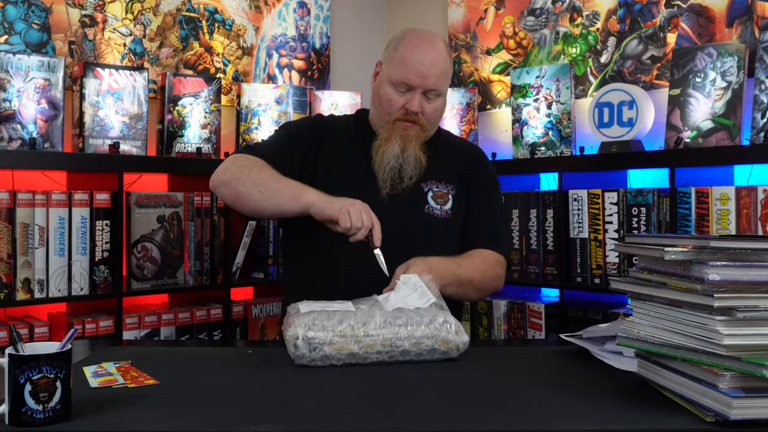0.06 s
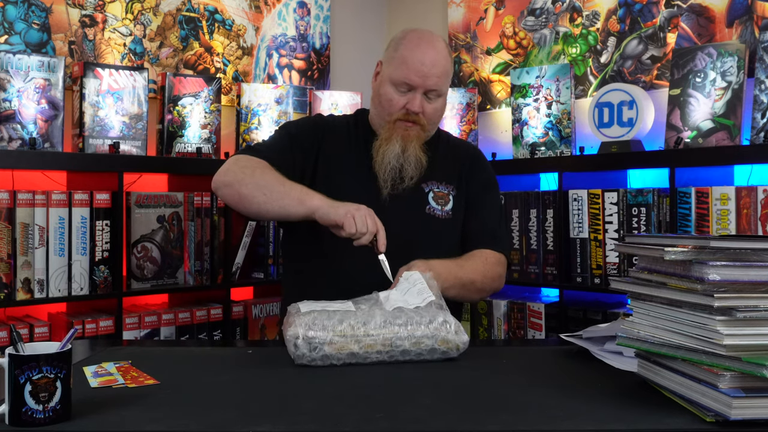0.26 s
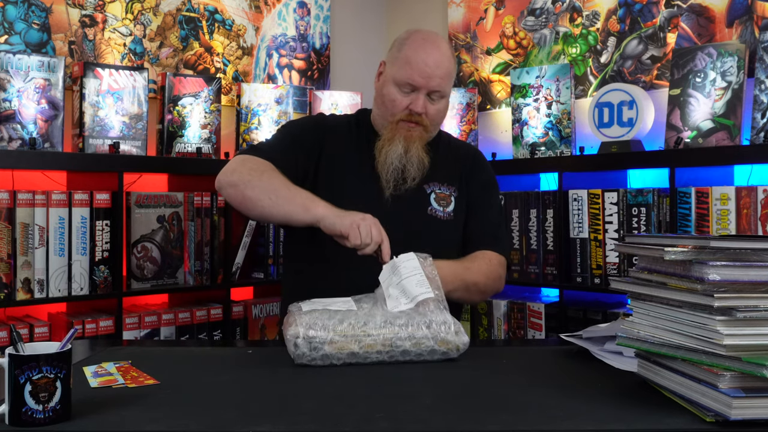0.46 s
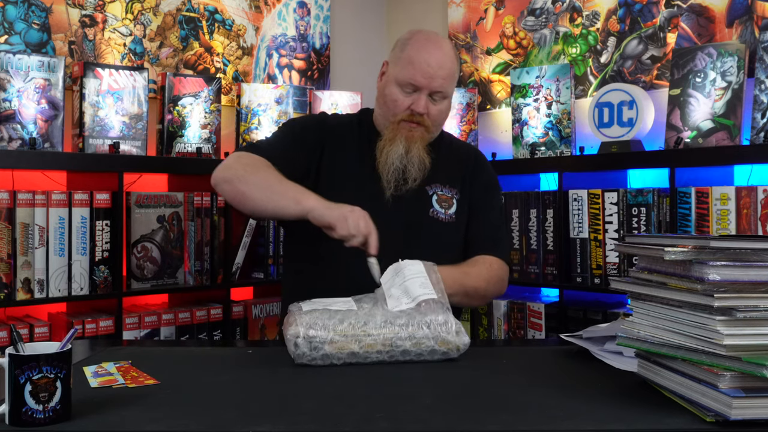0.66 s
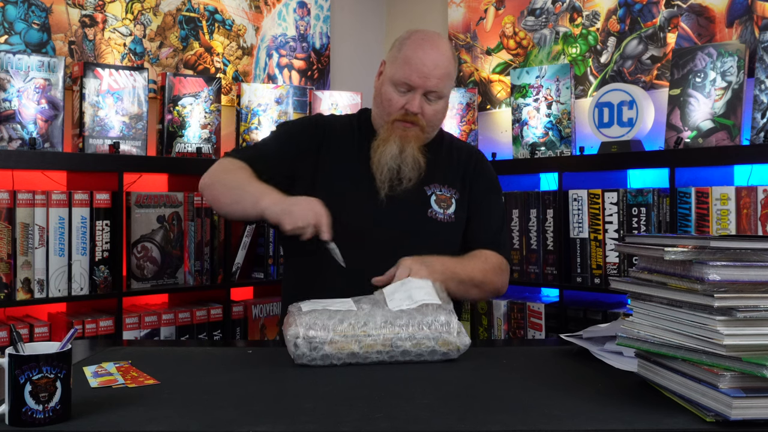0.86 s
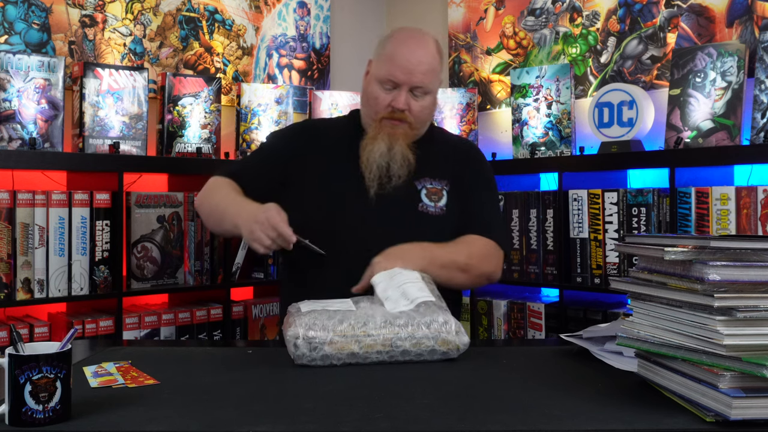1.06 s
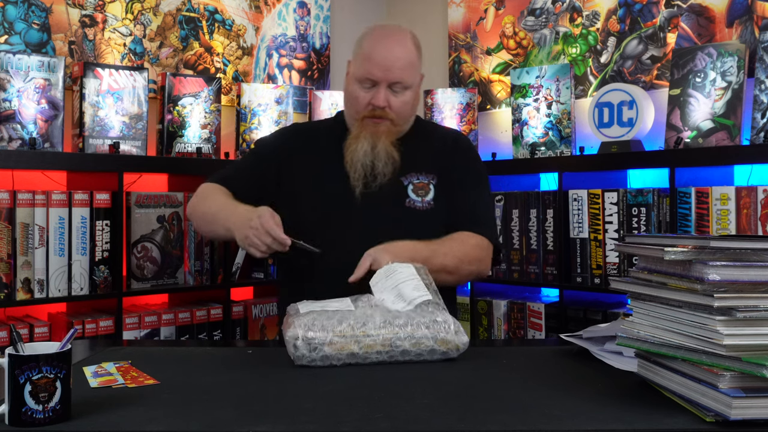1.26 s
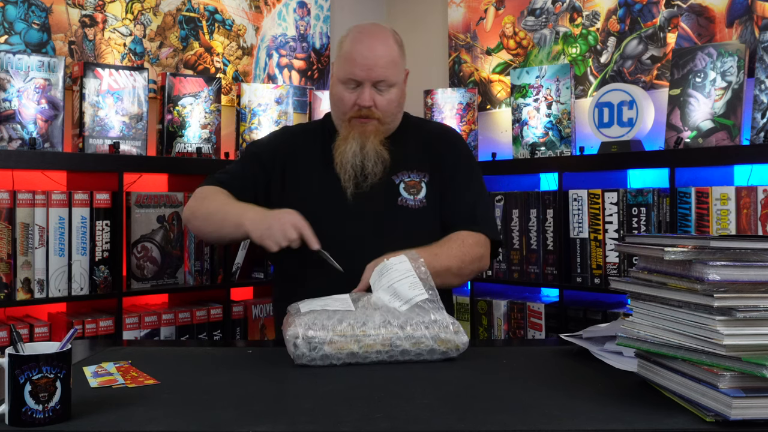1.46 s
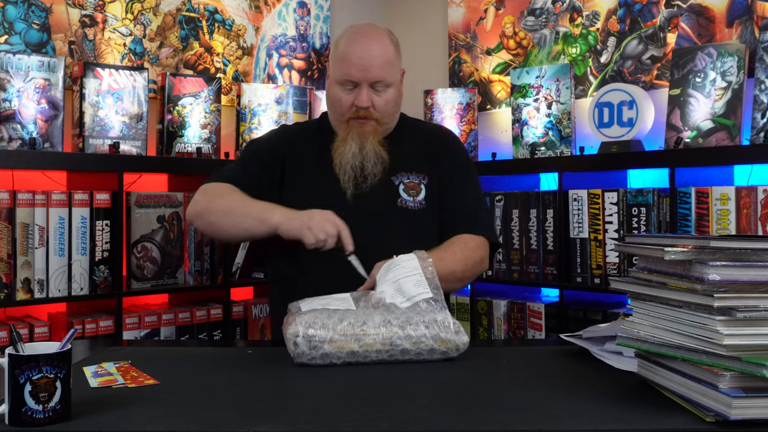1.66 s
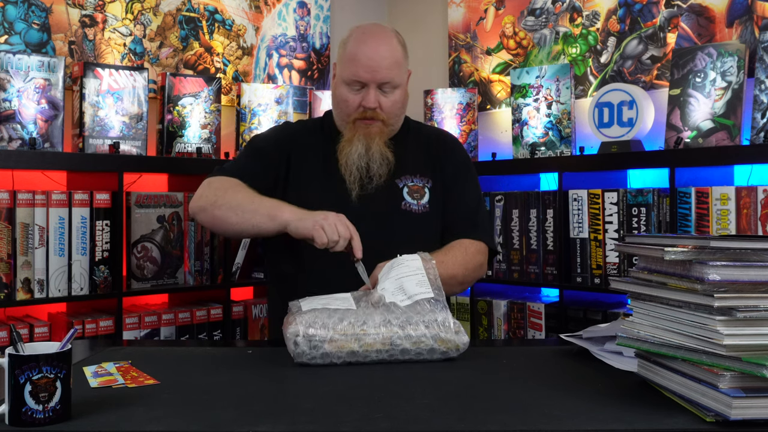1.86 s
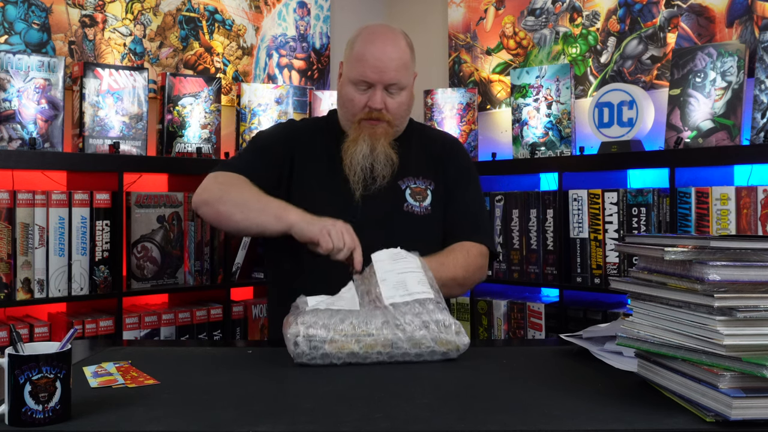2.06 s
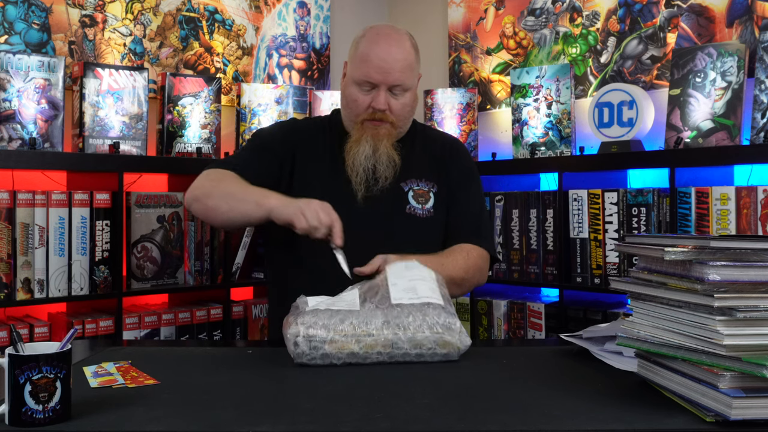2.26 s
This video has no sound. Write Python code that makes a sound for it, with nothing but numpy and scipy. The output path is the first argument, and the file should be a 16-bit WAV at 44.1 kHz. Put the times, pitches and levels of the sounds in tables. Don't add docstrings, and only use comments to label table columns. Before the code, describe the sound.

A plastic bubble mailer is slit open by a knife, heard close in a small furnished room. Crinkling runs throughout. A sharp snap at 0.2 s leads into fine blade ticks, then a loud cell pop and rasp near 0.39 s. Light crackles follow until rapid, hard tearing snaps at 1.3-1.55 s. It quiets, then another bubble bursts at 2.0 s, with small crackles after.

```python
import sys
import numpy as np
from scipy import signal
from scipy.io import wavfile
from scipy.ndimage import uniform_filter1d

SR = 44100
rng = np.random.default_rng(int(sys.argv[2]) if len(sys.argv) > 2 else 0)


def ratio_of_db(decibels):
    return 10 ** (np.asarray(decibels, float) / 20)


def int16_out(signal):
    q = np.round(np.clip(np.atleast_2d(signal).T, -1, 1) * 32767)
    wavfile.write(sys.argv[1], SR, q.astype(np.int16))


N = 101429


def evened(x):
    return x / np.sqrt(np.mean(x ** 2) + 1e-20)


def read(points, hz):
    f, value = np.transpose(points)
    return np.interp(np.log(hz + 1), np.log(f + 1), value)


def add(mix, s, sound):
    part = mix[round(s * SR):][:len(sound)]
    part += sound[:len(part)]


def impulse(length):
    return 1. * (np.arange(length) == 0)


def coloured(x, points, skirt_db=-25):
    hz = abs(np.fft.fftfreq(4096, 1 / SR))
    (low_hz, low_db), (high_hz, high_db) = points[0], points[-1]
    below, above = (low_hz / 3, low_db + skirt_db), (high_hz * 2, high_db + skirt_db)
    log_gain = np.log(ratio_of_db(read([below] + list(points) + [above], hz)))
    phase = -signal.hilbert(log_gain).imag
    taps = np.fft.ifft(np.exp(log_gain + 1j * phase)).real[:2048]
    return signal.oaconvolve(x, taps)[:len(x)]


def ring(hz, t60, sag=0.):
    t = np.arange(3000) / SR
    pitch = hz * (1 - sag * np.minimum(6 * t / t60, 1))
    turns = np.cumsum(pitch) / SR
    rise_s = .00005
    return (1 - np.exp(-t / rise_s)) * ratio_of_db(-60 * t / t60) * np.sin(2 * np.pi * turns)


# (f/Hz, level/dB per Hz)
AIR_SPECTRUM = [(12, -25), (20, -1.5), (377, -4.5), (434, 6), (558, -35), (1570, -30), (3340, 1),
                (7730, -22), (16000, -22)]


def room_air():
    return ratio_of_db(-60) * evened(coloured(rng.standard_normal(N), AIR_SPECTRUM))


# (t/s, level/dB, share of the soft body/dB)
GRIP_EFFORT = [(0, -44, -1.5), (.06, -47.5, -5), (.12, -49.5, -4), (.19, -57.5, -6), (.33, -51.5, -4),
               (.38, -54, -26), (.52, -56.5, 7.5), (.62, -62.5, -1.5), (.73, -49, -5), (.8, -56.5, -3.5),
               (.86, -47, -3), (0.978, -48, -2.5), (1.007, -55.5, -5.5), (1.14, -41.5, -7), (1.3, -46, -2),
               (1.7, -59.5, -1), (2.19, -76, 5), (2.27, -52, -2)]
# (f/Hz, level/dB per Hz)
FILM_SPECTRUM = [(710, -32), (1200, -11.5), (1560, -8), (2250, -11), (2450, -6), (3430, 1.5), (7820, -12.5),
                 (12900, -23.5), (16000, -31)]
# (f/Hz, level/dB per Hz)
BODY_SPECTRUM = [(59, -32), (100, -20.5), (576, -1), (817, -4), (1060, -1.5), (1540, -10.5), (2500, -0.5),
                 (3250, -43), (5500, -120)]


def crinkle():
    grains_per_s, spread_db, clump_db, body_gain_db = 1800, 5.2, 2.6, -1.5
    t = np.arange(N) / SR
    s, effort_db, body_db = np.transpose(GRIP_EFFORT)
    slow = uniform_filter1d(rng.standard_normal(N), 300)
    clumps = evened(uniform_filter1d(slow, 300))
    size_db = spread_db * np.minimum(rng.exponential(1, (2, N)), 4) + clump_db * clumps
    draw, chance = rng.random((2, N)), grains_per_s / SR
    signs = (draw < chance) - 2. * (draw < chance / 2)
    grains = ratio_of_db(size_db) * signs
    film = evened(coloured(grains[0], FILM_SPECTRUM))
    body = evened(coloured(grains[0] + grains[1], BODY_SPECTRUM))
    body = body * ratio_of_db(body_gain_db + np.interp(t, s, body_db))
    return (film + body) * ratio_of_db(np.interp(t, s, effort_db))


# (delay t/s, level/dB)
DESK_ECHOES = [(.0006, -8.5), (.0011, -21.5)]


def snap(spike, film_hz, cushion_db, luck):
    spike = ratio_of_db(-4.3) * spike / abs(spike).max()
    t60 = .0045 * (.7 + .5 * luck[0])
    partner_hz = 1.298 * film_hz * (1.0 + 0.033 * luck[3])
    film = ring(film_hz, t60) + ratio_of_db(-2) * ring(partner_hz, 0.31 * t60)
    tick = ratio_of_db(-19) * ring(5800 * (0.92 + 0.37 * luck[1]), t60=0.0041)
    film = 1.1 * film + tick
    cushion = ratio_of_db(cushion_db) * ring(1350 * (.9 + .2 * luck[2]), t60=.012, sag=.5)
    cut = signal.butter(N=2, Wn=320, btype="high", fs=SR, output="sos")
    direct = signal.sosfilt(cut, spike + film + cushion)
    bare = signal.sosfilt(cut, 1.5 * spike + .3 * film + .45 * cushion)
    near = direct.copy()
    for (s, db), chance in zip(DESK_ECHOES, luck[4:]):
        add(near, s * (0.69 + .5 * chance), ratio_of_db(db) * direct[:2000])
    return near, bare


# (f/Hz, level/dB)
BREAK_SPECTRUM = [(500, -20), (1500, -14), (2400, -20), (3300, 0), (5000, -1), (6500, -9), (10000, -14),
                  (16000, -26)]


def snaps(table):
    break_hz = 3700
    out, n = np.zeros((2, N)), np.arange(3000)
    spike = coloured(impulse(3000), BREAK_SPECTRUM)
    for (s, db, film_hz, cushion_db), luck in zip(table, rng.random((30, 6))):
        own = np.interp(n * np.sqrt(film_hz / break_hz), n, spike)
        for mix, x in zip(out, snap(own, film_hz, cushion_db, luck)):
            add(mix, s, ratio_of_db(db) * x)
    return out


# (t/s, level/dB, film f/Hz, cushion share/dB)
CREASE_FLIPS = [(0.0197, -36, 3200, 0), (0.0368, -27, 3500, -18), (0.0811, -36.5, 4700, 3.5),
                (0.1174, -29, 4300, -37), (0.1317, -26.5, 3300, -4.5), (0.2104, -37, 4900, -8),
                (0.5366, -27.5, 2800, -19), (0.5477, -27, 2800, -14), (0.5663, -33, 2110, -1.5),
                (0.5822, -30.5, 2310, -28), (0.6054, -39, 3680, -27), (0.6271, -42, 3520, -16),
                (0.7925, -32, 3220, -7), (0.8833, -32, 3440, -6), (0.9372, -34, 4170, 3.5),
                (0.9746, -29, 3430, -5.5), (1.0315, -37, 4240.0, -7.5), (1.0574, -34, 4100, -42),
                (1.1205, -39, 3480, -19), (1.151, -41, 3500, 5), (1.1685, -29, 3130, -2.5),
                (1.2411, -30.5, 2380, -4.5), (1.8928, -32.5, 3540, -17), (1.9229, -42, 3300, -3),
                (1.9373, -37.5, 3160, -8), (1.9521, -33, 2960, -12), (2.1225, -34, 4470, -0.5)]


def creases():
    return snaps(CREASE_FLIPS)


# (t/s, level/dB, film f/Hz, cushion share/dB)
BLADE_SLIPS = [(.2268, -24, 3400, -20), (.2385, -24, 3200, -20), (.245, -25, 4800, -25),
               (.2485, -26, 3400, -20), (.254, -29, 4200, -20), (.2615, -29, 4000, -20),
               (.270, -28, 3600, -20), (.2725, -25, 3500, -20), (.2745, -27, 3500, -20),
               (.2775, -23, 3500, -20), (.282, -28, 3500, -20), (.287, -24, 3600, -20),
               (.2925, -28, 3500, -20), (.295, -26, 3500, -20), (.301, -29, 3200, -20),
               (.3355, -15, 3000, -18), (.0505, -29, 3260, -20), (2.1941, -22, 2900, -14)]


def blade_slips():
    b, a = signal.butter(N=2, Wn=6500, fs=SR)
    return signal.lfilter(b, a, snaps(BLADE_SLIPS))


# (t/s, level/dB, f/Hz, t60/s)
KNOCKS = [
    (0.1307, -34.5, 553, 0.028),
    (.2195, -25.5, 2330, 0.011),
    (0.33, -32, 1550, 0.017),
    (0.56, -29, 1060, 0.0033),
    (.975, -33, 670, 0.02),
    (1.6621, -38, 650, 0.015),
    (1.9649, -27, 1370, 0.0087),
    (2.1936, -34.5, 1000, 0.0036),
    (1.545, -38, 360, 0.096),
    (1.434, -30.5, 613, 0.042),
]


def thuds():
    out = np.zeros(N)
    for s, db, hz, t60 in KNOCKS:
        undertone = ratio_of_db(-8) * ring(0.54 * hz, t60)
        add(out, s, ratio_of_db(db) * (ring(hz, t60, sag=0.2) + undertone))
    return out


# (t/s, level/dB, film f/Hz, cushion share/dB)
TEAR_SNAPS = [(0.2013, -26.5, 3570, -10), (0.2195, -9, 3510, -54), (0.2247, -25, 3340, -27),
              (0.3408, -31, 3320, -19), (0.8501, -23.5, 3060, -19), (1.0818, -21.5, 3450, -7.5),
              (1.1335, -26.5, 3970, -8), (1.2171, -31, 3600, -29), (1.2875, -26, 3380, -20),
              (1.3096, -10.5, 4440, -15), (1.3342, -6.5, 4000, -12.5), (1.3556, -9, 4000, -12),
              (1.3766, -4, 3900, -6.5), (1.3933, -19, 4500, -30), (1.4178, -20, 4770, -10),
              (1.4, -5, 3410, -12.5), (1.434, -1.5, 3500, -2.5), (1.443, -1.9, 3110, -39),
              (1.458, -6, 3800, -10.5), (1.4683, -11.5, 3100, -39), (1.5146, -29, 3300, 3),
              (1.5365, -8.5, 3180, -6.5), (1.5495, -6.5, 4093, -2.5), (1.6248, -25.5, 3500, -36),
              (1.6638, -26, 3450, -19), (1.7749, -26.5, 4150, -16), (1.9646, -27.5, 3650, -6),
              (2.1943, -26.5, 4920, -2), (2.2503, -32.5, 4150, -2)]


def tears():
    return snaps(TEAR_SNAPS)


# (start t/s, length t/s, level/dB, f/Hz)
RASPS = [
    (0.229, 0.04, -36, 3340),
    (0.263, 0.038, -34, 3670),
    (0.39, .017, -15, 3460),
    (1.765, .045, -40, 4430),
    (2.014, 0.044, -27, 3230),
]


def scrapes():
    slips_per_s, spread = 1600, 0.099
    out = np.zeros(N)
    for s, length, db, hz in RASPS:
        luck, stroke = rng.random((60, 3)), np.zeros(8000)
        for place, tone, size in luck[:round(length * slips_per_s)]:
            swell = np.sin(np.pi * place ** .5) ** .5
            slip = ring(hz * np.exp(spread * (2 * tone - .7)), t60=0.0019)
            add(stroke, place * length, swell * ratio_of_db(14.1 * size) * slip)
        add(out, s, ratio_of_db(db) * stroke)
    return out


# (t/s, room feed level/dB, parcel level/dB)
BURSTS = [
    (0.3866, -3.5, 0),
    (2.007, -2, 1.5),
]
# (t/s, level/dB, film f/Hz, cushion share/dB)
BURST_CRACKS = [(.3873, -5, 4370, -22), (.3880, -11, 4800, 7.5), (.3921, -7, 3470, -8),
                (.3946, -0.5, 3140, -19), (.3957, -16.5, 3080, -27), (.3968, -11, 3900, -17),
                (.3995, -15, 3150, -16), (.4022, -10.5, 3060, 3), (.4195, -32, 2960, 6),
                (2.0071, -8, 2900, 2.5), (2.0077, 1, 3300, -9), (2.0086, -8, 3300, -20),
                (2.0153, -16, 3600, -21), (2.0200, -16, 2630, 5.5)]
# (f/Hz, level/dB, t60/s)
PARCEL_MODES = [
    [(199, -14, 0.033), (296, -19, 0.1), (495, -15.5, 0.079), (712, -13.5, 0.041), (950, -17, 0.038),
     (1045, -16.5, 0.11), (1440, -27.5, 0.0491)],
    [(184, -16.5, 0.041), (286, -26, 0.16), (440, -23.5, 0.031), (553, -17, 0.064), (742, -21.5, 0.17),
     (880, -14, 0.028), (1180, -29, 0.045)],
]
# (f/Hz, level/dB per Hz)
BLAST_SPECTRUM = [(150, -2.5), (300, -14.5), (750, -9.5), (1300, -16), (2200, -22), (3300, -15.5),
                  (5000, -19.5), (16000, -34.5)]


def pops():
    near, far = snaps(BURST_CRACKS)[0], np.zeros(N)
    puff = coloured(impulse(2048), BLAST_SPECTRUM)
    puff = puff / np.linalg.norm(puff)
    for (s, db, parcel_db), modes in zip(BURSTS, PARCEL_MODES):
        for k, (hz, level_db, t60) in enumerate(modes):
            sign = (-1) ** k
            add(near, s, ratio_of_db(parcel_db) * sign * ratio_of_db(level_db) * ring(hz, t60))
        add(far, s + 0.00041, ratio_of_db(11.5 + db) * puff)
    return near, far


# (f/Hz, t60/s)
ROOM_T60 = [(150, 0.41), (400, 0.27), (1000, 0.21), (2500, .21), (6000, 0.2), (14000, 0.19)]
# (f/Hz, level/dB)
ROOM_SPECTRUM = [(100, -23), (250, -1.5), (900, 3), (1800, 9.5), (3300, 2), (7000, -3.5), (15000, -1)]


def room(x):
    taps = np.zeros((3, SR // 2))
    at = np.arange(60, SR // 2 - 20, 12)
    at = at + rng.integers(0, 12, (3, len(at)))
    np.put_along_axis(taps, at, rng.choice([-1., 1.], at.shape), 1)
    hz, t, z = signal.stft(taps, SR, nperseg=256)
    decay_db = read(ROOM_SPECTRUM, hz)[:, None] - 60 * t / read(ROOM_T60, hz)[:, None]
    tail = signal.istft(z * ratio_of_db(decay_db), SR, nperseg=256)[1]
    cycles = np.arange(N) / SR * 11 + np.arange(3)[:, None] / 6
    turn = np.cos(2 * np.pi * cycles) * np.sqrt(2 / 3)
    return signal.fftconvolve(x * turn, tail / np.linalg.norm(tail[0]), axes=1)[:, :N].sum(0)


def scene():
    rustle = crinkle() + thuds() + scrapes()
    snapping, bare = creases() + blade_slips() + tears()
    near, far = pops()
    wet = room(ratio_of_db(-5.5) * bare + far + ratio_of_db(-5) * rustle)
    low_cut = signal.butter(N=4, Wn=186, btype="high", fs=SR, output="sos")
    return (signal.sosfilt(low_cut, near + snapping + rustle + wet) + room_air())[None]


def low_pass(x):
    return signal.sosfilt(signal.butter(12, 16810, fs=SR, output="sos"), x)


def record(dry):
    held = dry / (1 + dry ** 8) ** (1 / 8)
    band = signal.firwin(255, 16300, window=("kaiser", 9), fs=SR)
    held = signal.oaconvolve(held, band[None], "same")
    return low_pass(held)


dry = scene()
out = record(dry)
int16_out(out)
```